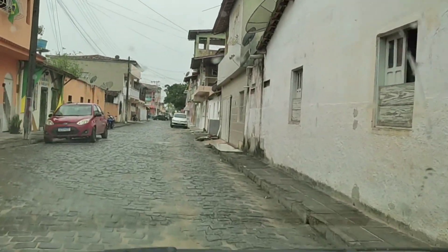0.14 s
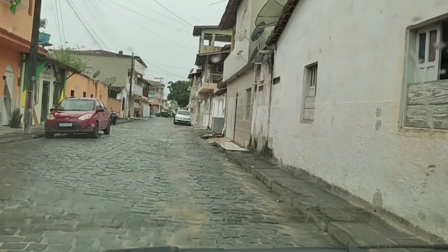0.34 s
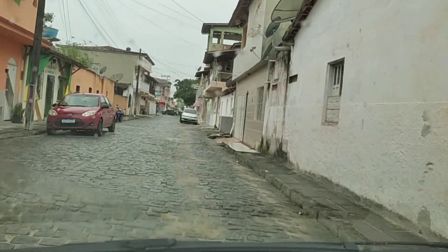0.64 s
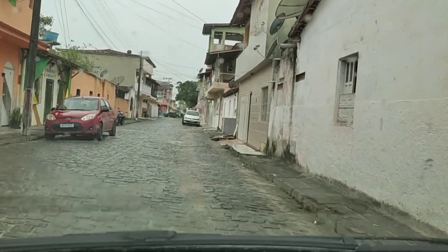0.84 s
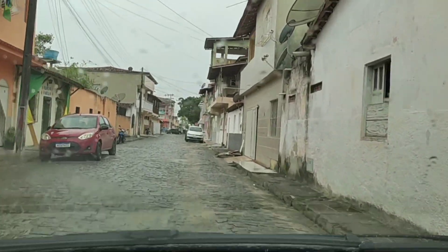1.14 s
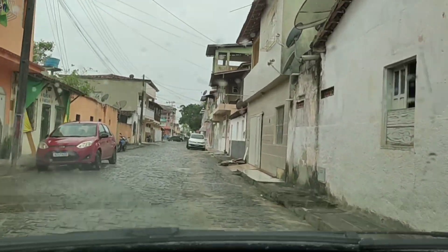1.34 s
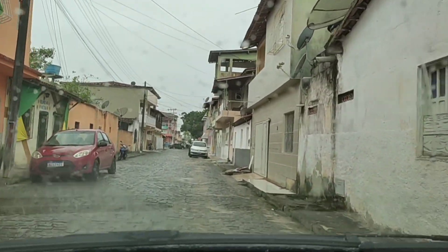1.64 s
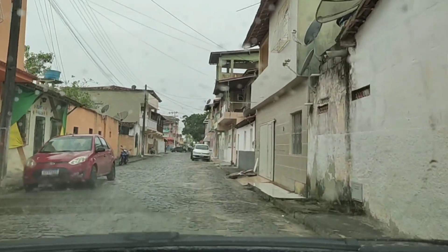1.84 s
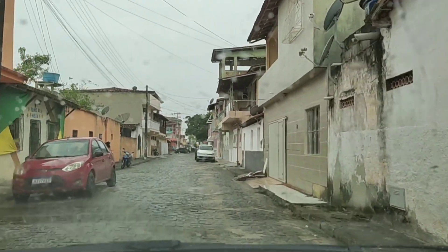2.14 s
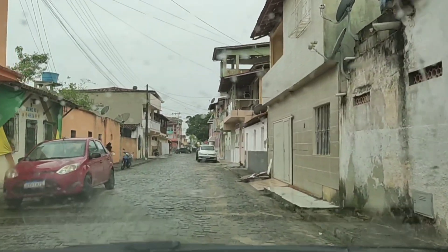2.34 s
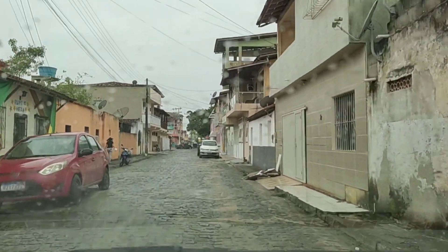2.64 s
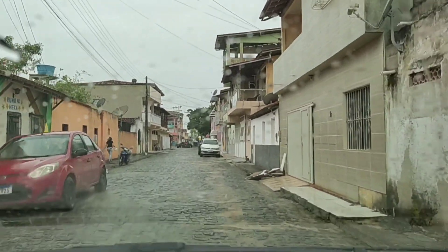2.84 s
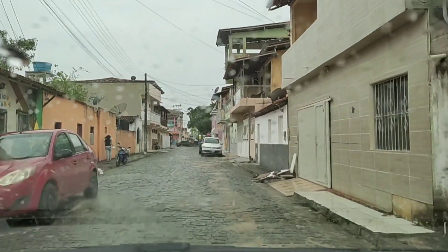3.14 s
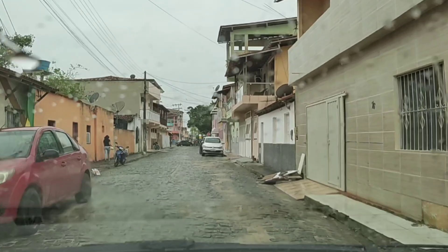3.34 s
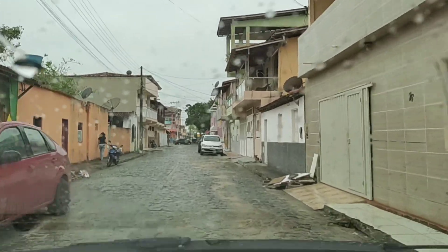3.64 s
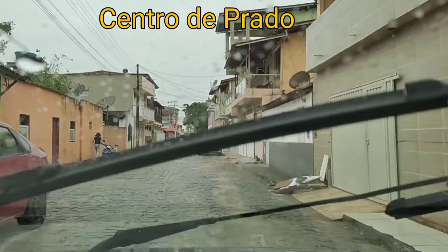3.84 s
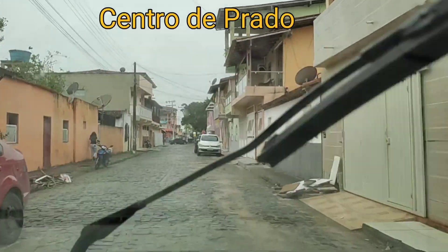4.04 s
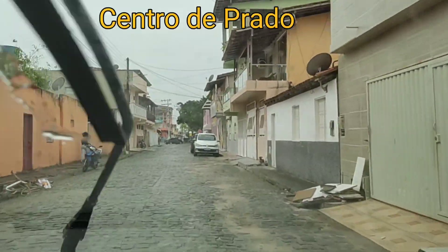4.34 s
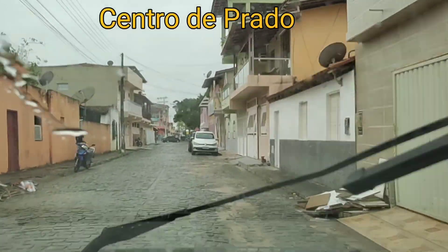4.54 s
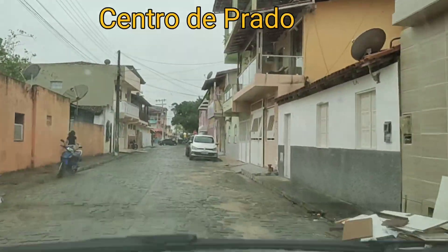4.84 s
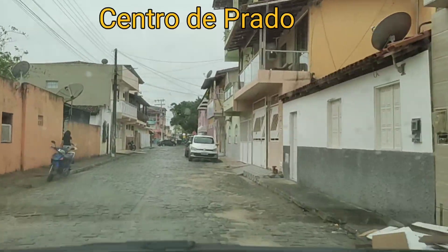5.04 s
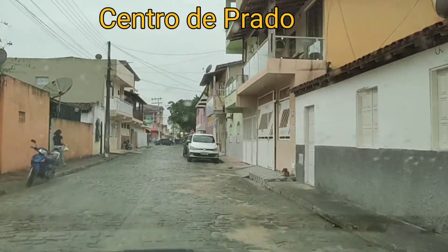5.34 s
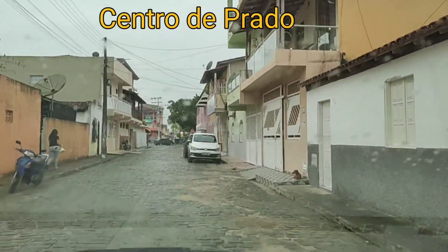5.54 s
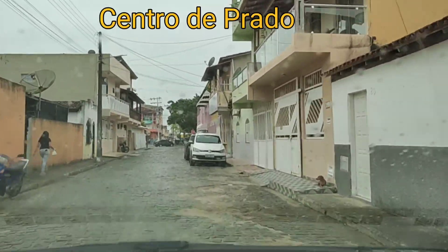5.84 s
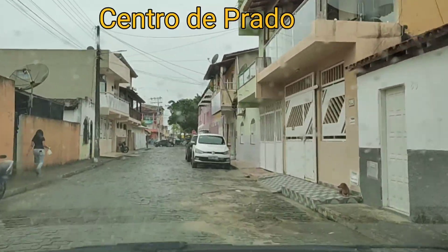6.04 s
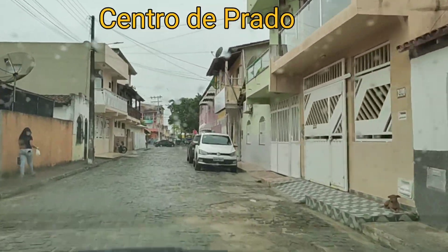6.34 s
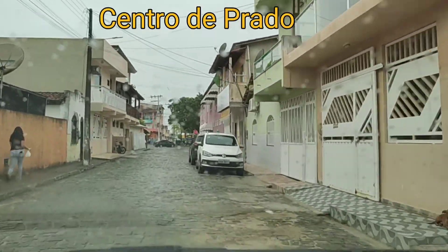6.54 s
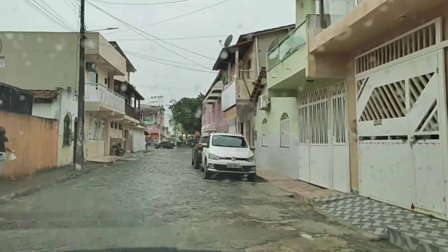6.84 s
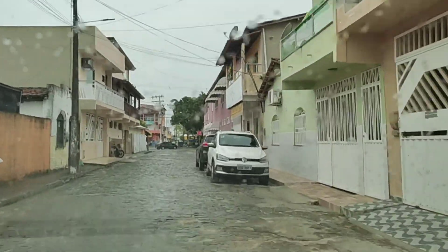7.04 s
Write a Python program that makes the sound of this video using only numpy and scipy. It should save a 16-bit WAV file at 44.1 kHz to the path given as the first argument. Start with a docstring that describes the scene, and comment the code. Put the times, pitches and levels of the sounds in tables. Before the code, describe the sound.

A low, bumpy rumble fills the cabin of a car moving slowly along a wet cobbled street. Faint tyre hiss and a couple of brief early splashes come through from outside, and the dashboard plastic chatters lightly close to the microphone. About halfway the rumble grows heavier, with dull suspension knocks. A wiper arm clacks once against its stop, and the knocks and rattles carry on.

```python
"""Inside a car rolling slowly over wet cobblestones. The stones drum on the tyres and make the body
boom, and the suspension knocks on bumps. Behind that, wet tyres hiss and splash, loose plastic trim
ticks, creaks and rattles, and a wiper snaps back to rest once. Two microphone openings on a small
housing hear the treble differently."""
import sys
import numpy as np
from scipy import signal
from scipy.fft import rfft, irfft, next_fast_len
from scipy.io import wavfile
from scipy.ndimage import uniform_filter1d, map_coordinates

SR = 44100
rng = np.random.default_rng(int(sys.argv[2]) if len(sys.argv) > 2 else 0)


def unload_wav(signal):
    """Save mono or channel-first audio to the path in sys.argv[1] as 16-bit WAV at rate SR, clipped to [-1, 1]."""
    wavfile.write(
        sys.argv[1],
        SR,
        np.round(np.clip(np.atleast_2d(signal).T, -1, 1) * 32767).astype(np.int16),
    )


N = 317079


def amp(db):
    """Turn decibels into a gain."""
    return 10 ** (np.asarray(db) / 20)


def unit(x):
    """Scale x to an average (rms) level of 1."""
    return x / np.sqrt(np.mean(np.abs(x) ** 2) + 1e-20)


def along(points, hz):
    """Read between (frequency, value) points on a log scale."""
    f, v = np.transpose(points)
    return np.interp(np.log(hz + 1), np.log(f + 1), v)


def curves(rows):
    """Join (time, values...) rows into one curve per value column."""
    times, *columns = np.transpose(rows)
    return [np.interp(np.arange(N) / SR, times, c) for c in columns]


def wobble(rate):
    """A smooth curve through `rate` random points a second."""
    return map_coordinates(rng.standard_normal(int(N * rate / SR) + 4), [np.arange(N) * rate / SR])


def filtered(x, response):
    """Scale each frequency in x by response(frequency)."""
    m = next_fast_len(N + SR // 2)
    return irfft(rfft(x, m) * response(np.fft.rfftfreq(m, 1 / SR)), m)[..., :N]


def resonances(modes, f):
    """How strongly an object with these ringing notes (modes) answers at frequency f."""
    return sum((-1) ** k * amp(db) * 1j * f * width / (hz * hz - f * f + 1j * f * width)
               for k, (hz, width, db) in enumerate(modes))


def ring(x, modes, passes=1):
    """Let x ring an object; a second pass leaves less sound between its notes."""
    return filtered(x, lambda f: unit(resonances(modes, f) ** passes))


def band(f, low, high):
    """A gain that fades out below low and above high [Hz]."""
    return (f / low) ** 4 / (1 + (f / low) ** 4) / (1 + (f / high) ** 4)


def rush(spectrum, patchy_db):
    """Two rushing noises that share random louder and softer patches."""
    noise = signal.stft(rng.standard_normal((2, N)), nperseg=512)[2]
    patches = uniform_filter1d(uniform_filter1d(rng.standard_normal(noise.shape[1:]), 8, 0), 8, 1)
    pair = signal.istft(noise * amp(patchy_db * unit(patches)), nperseg=512)[1][:, :N]
    return unit(filtered(pair, lambda hz: amp(along(spectrum, hz))))


def bursts(times, levels_db, fade, rise, snap_db=-60):
    """Puffs of noise that start with a snap and drop 60 dB in `fade` seconds."""
    t, envelope = np.arange(SR // 8) / SR, np.zeros(N + SR)
    snap = amp(snap_db - 60 * t / .0047)
    shape = (amp(-60 * t / fade) + snap) * (1 - np.exp(-t / rise))
    for s, db in zip(times, levels_db):
        envelope[round(s * SR):][:len(t)] += amp(db) * shape
    return envelope[:N] * rng.standard_normal((2, N))


def evened(x, share):
    """Flatten a share of the chance swells in x."""
    size = np.sqrt(np.abs(uniform_filter1d(unit(x[0]) ** 2, size=900))) + .13
    return unit(x / size ** share)


# how the wet hiss rises and falls (time [s], level [dB])
HISS_LEVELS = [(0.0, -50.5), (0.82, -53), (1.4, -51.5), (1.58, -54), (1.96, -52), (3.08, -51.5),
               (4.06, -48), (4.71, -54), (4.83, -47.5), (4.98, -47), (5.13, -44.5), (5.41, -53),
               (5.65, -50.5), (5.81, -48), (6.17, -51.5), (6.37, -46), (6.51, -52.5), (6.73, -50.5),
               (7.19, -44.5)]
# tone of the road roar, the hiss and the fine spray (frequency [Hz], level [dB])
ROAR_TONE = [(240, -51), (400, -4.5), (510, -15.5), (601, -6), (668, -10), (728, -11.5), (870, -11),
             (2200, -23), (2860, -57), (4840, -120)]
HISS_TONE = [(880, -23), (1500, 7), (1630, 4.5), (1780, -56), (2220, 1), (5580, -10.5), (6920, -13.5),
             (7540, -19), (9500, -29.5), (12400, -51), (20900, -120)]
SPRAY_TONE = [(6500, -63), (8000, -9), (9400, -6), (11100, -6.5), (11700, 0), (12500, -1), (14000, -6),
              (14350, -11), (14600, -69)]

def wet_tyres():
    """Road roar through the floor swells with the hiss and spray of wet tread; jolts make them flutter."""
    hiss_db, = curves(HISS_LEVELS)
    swell_db = hiss_db - hiss_db.mean()
    jolt = wobble(26)
    roar = amp(-40 + .5 * swell_db + .5 * jolt) * rush(ROAR_TONE, patchy_db=1.64)
    hiss = amp(hiss_db + 1.87 + .7 * jolt) * rush(HISS_TONE, patchy_db=2.1)
    spray = amp(-64 + .95 * swell_db + 3.8 * jolt + 1.3 * wobble(3.9)) * rush(SPRAY_TONE, patchy_db=2.5)
    return roar + hiss + spray


# splashes at full strength (start [s], end [s], level [dB])
SPLASHES = [(1.534, 1.748, -44.5), (2.586, 2.706, -54)]
# tone of the flying water (frequency [Hz], level [dB])
SPLASH_TONE = [(1290, -34), (2200, -1), (3060, -6), (4570, -6), (5430, -11), (9200, -17), (12200, -4.5),
               (14300, -11), (14600, -71)]

def splashes():
    """The tyres throw up sheets of water that build, hold and quickly stop."""
    t = np.arange(N) / SR
    rise, fall = 98, 350  # dB per second
    envelope = sum(amp(db - rise * np.maximum(start - t, 0) - fall * np.maximum(t - end, 0))
                   for start, end, db in SPLASHES)
    return envelope * rush(SPLASH_TONE, patchy_db=2.5)


# creaking joints (time [s], level [dB], pitch [Hz])
CREAKS = [(0.24, -40, 1050), (0.974, -35, 780), (4.47, -42, 840), (5.264, -35.5, 1616),
          (5.666, -35.5, 1320), (5.711, -34, 1263), (5.829, -47, 840), (6.843, -37, 1344)]

def creaks():
    """Rubbing joints sound a brief, slightly rough note."""
    out, t = np.zeros((2, N + SR)), np.arange(SR // 12) / SR
    for s, db, hz in CREAKS:
        drift = np.cumsum(rng.normal(0, .086, (2, len(t))), axis=1)
        envelope = amp(db + 6 - 60 * t / .096) * (1 - np.exp(-t / .002))
        out[:, round(s * SR):][:, :len(t)] += envelope * np.sin(2 * np.pi * hz * t + drift)
    return out[:, :N]


# rattles (time [s], level [dB], dashboard boost [dB], brightness [dB])
RATTLES = [(0.119, -43.5, -10, -1), (0.239, -40, 11, -5), (0.5517, -34.5, 5, -27), (1.1396, -38, -3, -4),
           (1.479, -48, 2, -2), (1.8832, -29.5, 5, -14.5), (2.061, -42, -6, -9), (2.607, -42.5, 6, -4),
           (2.658, -49, -2, 4), (2.7894, -43, 9, -21), (2.903, -45, 16, -18), (3.2303, -32.5, 7, -19),
           (3.3827, -39, 2, -1), (3.8084, -35.5, -9, -11), (3.965, -44.5, -1, 3), (4.0485, -36.5, -1, -5),
           (4.16, -40.5, -8, 0.5), (4.409, -44, -7, -3.5), (4.469, -44, 17, -8), (4.844, -31, 3, -6),
           (4.943, -41.5, 4, -2), (4.98, -38.5, -2, 0.5), (5.107, -44, 1, 0.5), (5.1726, -35.5, 2, -5),
           (5.2111, -36, -4, -5.5), (5.2644, -37, 8, -9), (5.3986, -43.5, 13.5, -10), (5.668, -38, 3, -11),
           (5.7105, -39.5, 14, -10), (5.7708, -35, -12, -22), (5.829, -37.5, 8, -13), (5.845, -37, -6, -9),
           (5.872, -45, -6, -6), (5.91, -34.5, 6, -5), (6.23, -38.5, 0, -4), (6.2572, -38.5, 6, -5),
           (6.288, -37, -6, -11), (6.365, -41, -6, -6), (6.4283, -33, 3, -12), (6.473, -47, -6, -4),
           (6.4925, -39, 1, -10), (6.7477, -42.5, 4, 1), (6.911, -39, -5, 0), (7.0332, -38.5, -9, -3),
           (7.0894, -40, -10, -7), (7.112, -27.5, 2, -5.5), (7.1696, -32, 4, -8.5)]
# thin, high ticks (time [s], level [dB])
TICKS = [(0.0684, -45), (0.119, -42), (0.3057, -41.5), (1.0685, -43), (1.1415, -37.5), (1.273, -45),
         (1.3865, -38), (1.8612, -41), (2.0576, -41.5), (2.2238, -32), (3.0035, -41), (4.0213, -46),
         (4.4513, -46), (4.797, -42), (5.1292, -39), (6.202, -45.5), (6.4043, -43), (6.56, -43),
         (6.8025, -42)]
# notes of the trim, dashboard, hard clips and the hollow under them (pitch [Hz], width [Hz], level [dB])
PLASTIC_NOTES = [(1894, 390, -0.5), (2460, 670, 3), (2790, 350, 5.5), (3660, 1360, -2)]
DASH_NOTES = [(1160, 520, 8.5), (1360, 160, -27), (1535, 210, 2)]
CLIP_NOTES = [(4450, 230, 4.5), (5600, 840, 1), (5990, 410, 4.5), (6770, 970, 1)]
HOLLOW_NOTES = [(8500, 1900, -17), (11580, 140, 0.5), (12600, 310, 0), (13200, 1900, -16)]

def loose_trim():
    """Loose plastic chatters: each tap rings the parts around it."""
    times, db, dash_db, bright_db = np.transpose(RATTLES)
    plastic = ring(bursts(times, db - 4, fade=.098, rise=.00025, snap_db=3), PLASTIC_NOTES, passes=2)
    dash = ring(bursts(times, db + dash_db - 5, fade=.085, rise=.0026), DASH_NOTES, passes=2)
    # faint taps at random times, stronger where the tyres hiss more
    when, size = rng.random((160, 2)).T
    faint_times = when * N / SR
    hiss_db, = curves(HISS_LEVELS)
    swell_db = hiss_db[(when * N).astype(int)] - hiss_db.mean()
    clips = bursts(times, db + bright_db - 3, fade=.11, rise=.00034, snap_db=8.5)
    clips += bursts(faint_times, -53 + 1.2 * swell_db + 8 * size ** 2, fade=.023, rise=.0012)
    tick_times, tick_db = np.transpose(TICKS)
    hollow = bursts(times, db - 8 + .92 * bright_db, fade=.1, rise=.0004, snap_db=-1)
    hollow += bursts(tick_times, tick_db - 2.5, fade=.054, rise=.00092, snap_db=2)
    hollow += bursts(faint_times, -60 + .6 * swell_db + 9 * size ** 2, fade=.046, rise=.0033)
    return plastic + dash + ring(clips, CLIP_NOTES, passes=2) + ring(hollow, HOLLOW_NOTES)


# the wiper arm hitting its stop (time [s], level [dB])
WIPER_HITS = [(4.5985, -11), (4.602, -10), (4.6046, -12.5), (4.6084, -25), (4.6125, -24)]
# notes of the arm and the panel under it (pitch [Hz], width [Hz], level [dB])
WIPER_NOTES = [(400, 190, 9.5), (800, 270, 4), (1250, 530, -7.5), (2040, 140, 6.5), (2500, 380, 1),
               (3530, 390, 1.5), (4400, 300, 1), (5940, 1100, -2), (8500, 10000, -11), (12250, 2800, -6)]

def wiper():
    """The arm drops to rest in a few sharp cracks that ring it and the panel."""
    times, db = np.transpose(WIPER_HITS)
    cracks = bursts(times, db, fade=.009, rise=.00015, snap_db=-5)
    tail = bursts(times[:1], db[:1] - 12.5, fade=.088, rise=.0019)
    arm = ring(cracks + tail, WIPER_NOTES)
    return arm - .26 * arm[::-1]  # it lands nearer the right microphone opening


# bumps in the road (time [s], level [dB])
BUMPS = [(0.241, -18), (0.346, -13), (1.4636, -12.5), (2.902, -7), (3.1068, -6.5), (3.6027, -10),
         (3.649, -5), (3.9, -18.5), (3.926, -10), (4.394, -10.5), (4.4668, -7.5), (5.403, -4),
         (5.8257, -8.5), (5.8784, -4), (5.9007, -5), (6.3939, -15), (6.4432, -1.5), (6.4992, -14),
         (6.821, -17), (6.8758, -8), (7.0517, -15)]
# notes of one knock (pitch [Hz], level [dB], time to fade 60 dB [s], delay [s])
KNOCK_NOTES = [(360, -2, .065, .001), (405, -3, .055, .001), (235, -14, .05, .001), (490, -10, .05, .0055),
               (265, -1, .065, .0135), (470, -8, .03, .0135), (590, -13, .045, .0055),
               (770, -21, .04, .0055)]

def suspension():
    """A bump rings the mount, then the rebound rings its support; each knock differs a little."""
    out, t = np.zeros((2, N + SR)), np.arange(SR // 5) / SR
    attack = 1 - np.exp(-t / .002)
    for s, bump_db in BUMPS:
        changes_db = rng.normal(0, 2.5, len(KNOCK_NOTES))
        scatter_phase = np.array([[0], [rng.uniform(0, 2 * np.pi)]])
        tuning = rng.normal(.99, .025)
        for (hz, db, fade, delay), change_db in zip(KNOCK_NOTES, changes_db):
            envelope = amp(bump_db + db + change_db - 60 * t / fade) * attack
            note = np.sin(2 * np.pi * tuning * hz * t + scatter_phase)
            out[:, round((s + delay) * SR):][:, :len(t)] += envelope * note
    return out[:, :N]


# how the rumble changes (time [s], boom level [dB], drumming level [dB], deep bass boost [dB])
RUMBLE_LEVELS = [(0.0, -23.5, -28.5, 3.5), (0.3, -30, -32, 5), (1.58, -26.5, -32, -1), (2.06, -24, -29, 0),
                 (3.5, -18, -28, 0), (4.12, -19, -24, -2.5), (4.24, -24, -25, 2.5),
                 (4.29, -16.5, -24.5, -0.5), (4.75, -22.5, -28, 0.5), (5.02, -17, -24, 1),
                 (5.53, -21, -26.5, 1), (5.87, -16.5, -24.5, 2), (6.63, -17.5, -24, 0),
                 (6.97, -17, -21, -2), (7.15, -13.5, -25, 0), (7.19, -26, -30, -2)]
# brief swells in the low boom (time [s], boost [dB])
BOOM_SWELLS = [(0.01, 8), (0.76, 8), (1.618, 12), (1.9, 3), (2.66, 3), (2.92, 4), (3.0, 0.5), (3.34, 3.5),
               (3.462, 3.5), (3.98, 3.5), (4.31, 1.5), (4.48, 6), (4.58, 6), (4.85, 8.5), (5.248, -1),
               (5.63, 9), (5.81, 2.5), (5.89, 3), (6.22, 5), (6.37, 7), (6.65, 5), (6.87, 5), (7.14, 2)]
# notes of the car body and the air inside (pitch [Hz], width [Hz], level [dB])
BODY_NOTES = [(40.7, 18, -12.5), (51.9, 22, -13.5), (85.4, 16.5, -3.5), (122.5, 23.4, -1), (142.5, 30, -3)]
# notes of the floor and dashboard (pitch [Hz], width [Hz], level [dB])
PANEL_NOTES = [(190, 24.8, -1), (246, 32.2, 1), (295.5, 39.3, -2.5), (366.2, 62, -8.5), (565, 180, -19),
               (625, 74, -17.5), (747, 39, -20)]

def cobblestones():
    """Each stone edge gives a tyre a blow of random size: the body booms and the panels drum."""
    def edges(per_second):
        return (rng.random((2, N)) < per_second / SR) * rng.uniform(-1.034, 1, (2, N))

    boom_db, drum_db, deep_db = curves(RUMBLE_LEVELS)
    blows = edges(600)
    deep = filtered(blows, lambda f: resonances(BODY_NOTES[:2], f) * band(f, 45, 200))
    upper = filtered(blows, lambda f: resonances(BODY_NOTES[2:], f) * band(f, 45, 200))
    boom = evened(upper + amp(deep_db) * deep, share=.59)
    drum = unit(filtered(edges(900), lambda f: resonances(PANEL_NOTES, f) * band(f, 170, 900)))
    t = np.arange(N) / SR
    swell_db = sum(db * np.exp(-((t - s) / .019) ** 2) for s, db in BOOM_SWELLS)
    boom *= amp(boom_db + 2.5 + swell_db + 1.8 * wobble(14))
    drum *= amp(drum_db + 2 + 1.34 * wobble(11))
    return boom + drum


def scene():
    """Row one is sound both microphone openings share; row two is sound scattered by the cabin."""
    return wiper() + cobblestones() + suspension() + wet_tyres() + splashes() + loose_trim() + creaks()


# how alike left and right sound (frequency [Hz], likeness [-1 to 1])
LIKENESS = [(45, .995), (95, 0.91), (300, 0.89), (520, 0.53), (900, -0.27), (1400, 0.077), (4500, 0.071),
            (6300, 0.61), (9300, 0.82), (11000, -0.0028), (14700, 0.14)]
# how much louder the left is than the right (frequency [Hz], level [dB])
LEFT_BOOST = [(60, -0.6), (500, 0.4), (1200, -2.5), (2500, -1.5), (4500, -3), (6500, -3.5), (8500, -2.5),
              (10300, 7), (11500, 12), (14400, 12)]
# the highest treble fades out above about 14 kHz (frequency [Hz], level [dB])
TREBLE_FADE = [(14350, 0), (14700, -22), (15300, -34)]

def record(dry):
    """Each opening mixes shared and scattered sound; loud peaks round off and the top treble is cut."""
    angle = lambda hz: np.arccos(np.clip(along(LIKENESS, hz), -1, 1)) / 2
    shared, scattered = filtered(dry, lambda hz: np.array([np.cos(angle(hz)), np.sin(angle(hz))]))
    stereo = np.array([shared + scattered, shared - scattered])
    left_gain = lambda hz: amp(along(LEFT_BOOST, hz) / 2)
    stereo = filtered(stereo, lambda hz: np.array([left_gain(hz), 1 / left_gain(hz)]))
    rounded = stereo / (1 + np.abs(stereo / .95) ** 4) ** (1 / 4)
    return filtered(rounded, lambda hz: amp(along(TREBLE_FADE, hz)) * (hz < 15300))


dry = scene()
out = record(dry)
unload_wav(out)
```